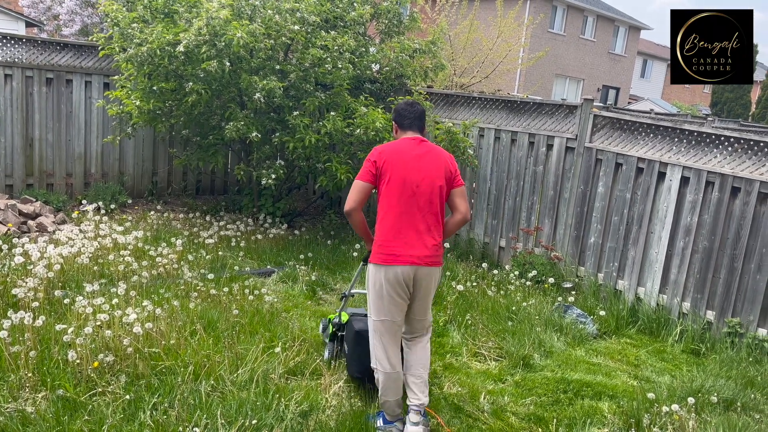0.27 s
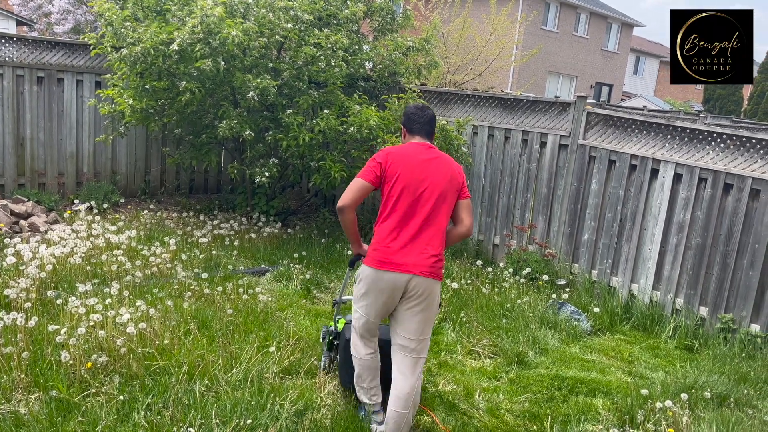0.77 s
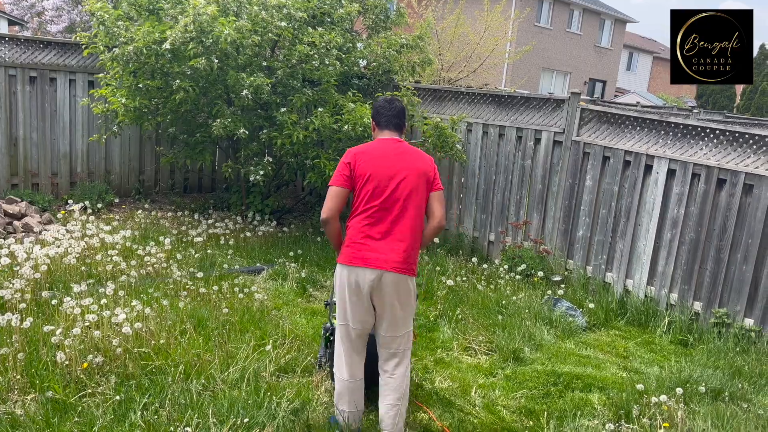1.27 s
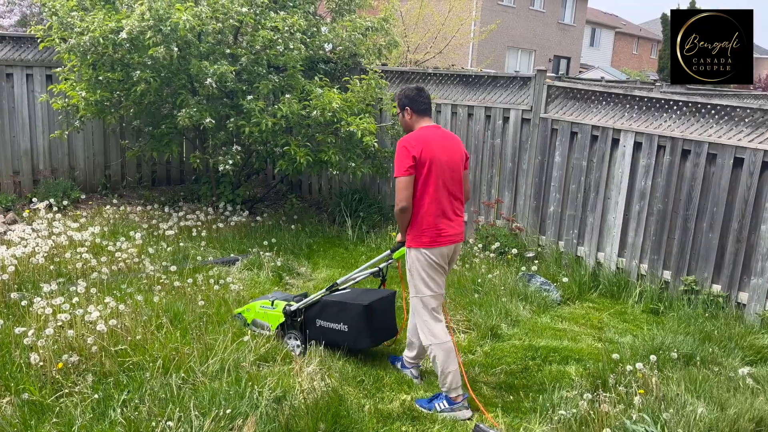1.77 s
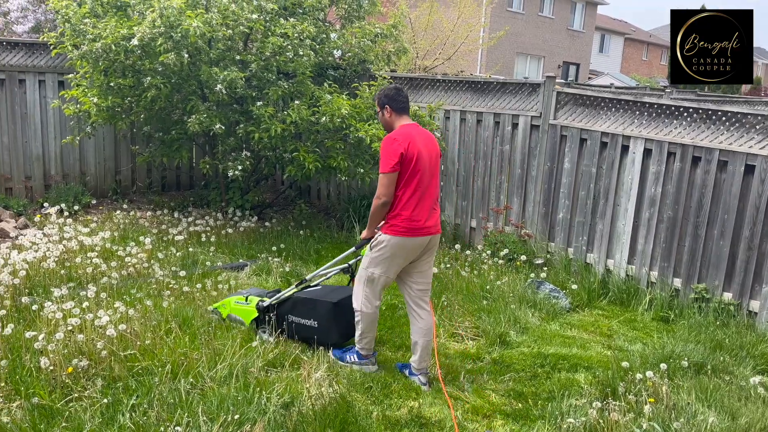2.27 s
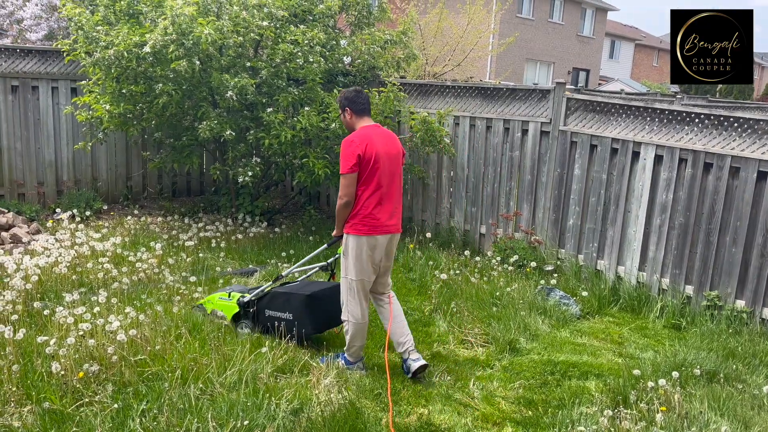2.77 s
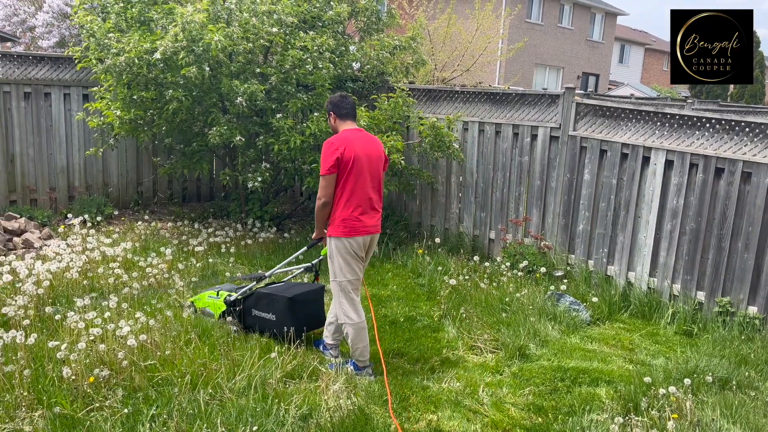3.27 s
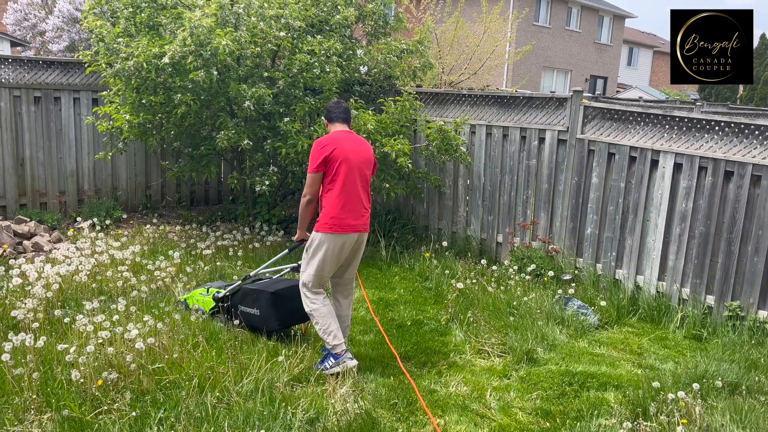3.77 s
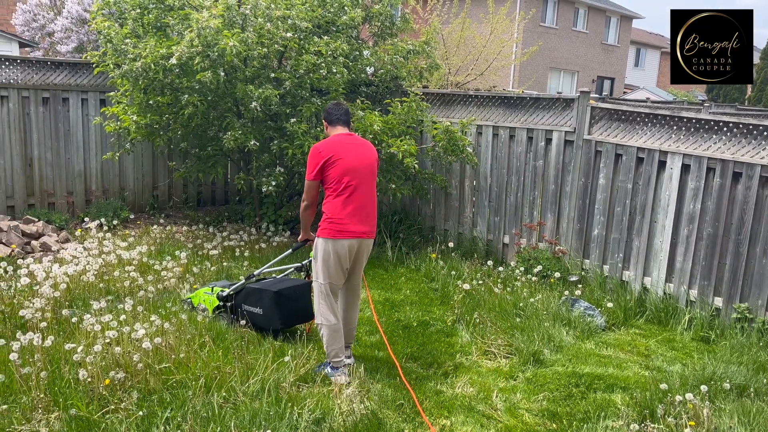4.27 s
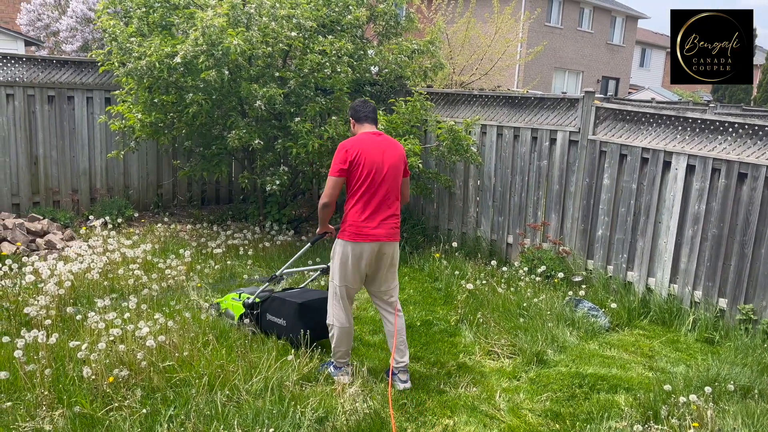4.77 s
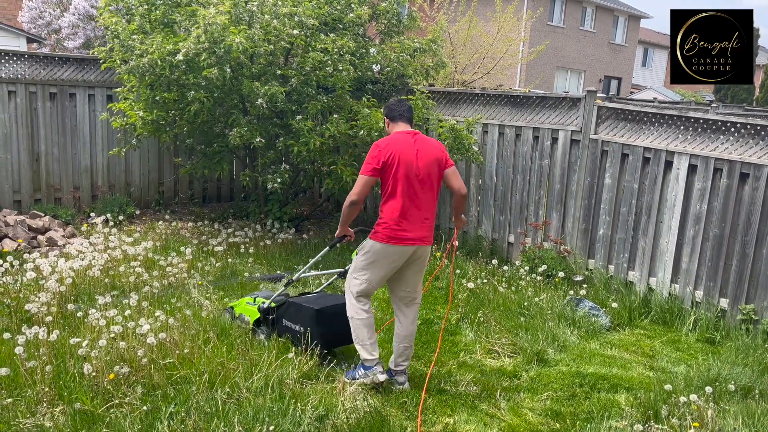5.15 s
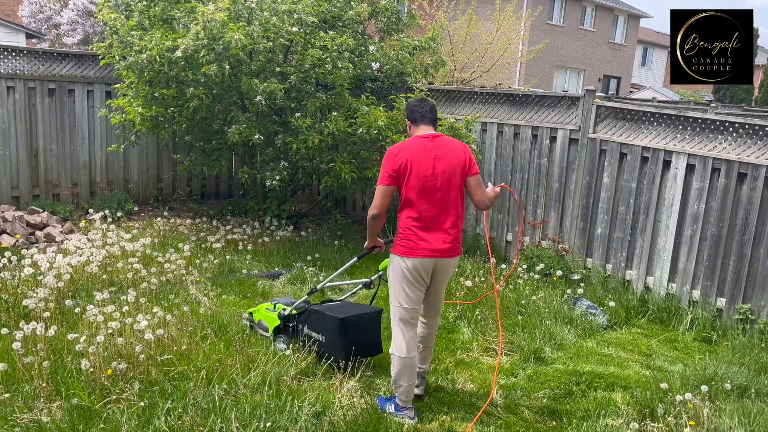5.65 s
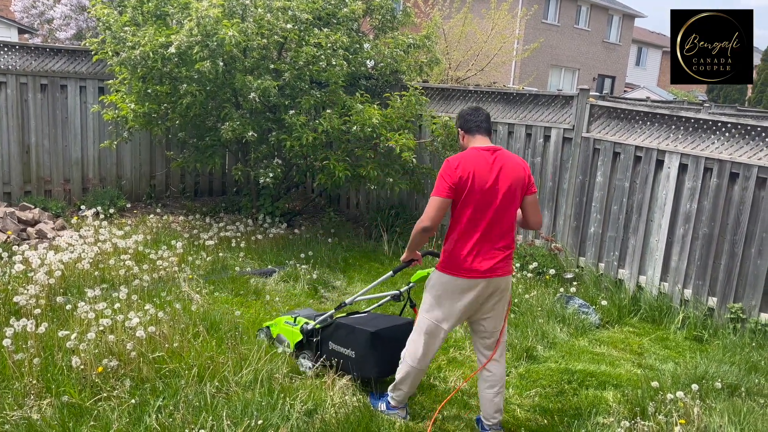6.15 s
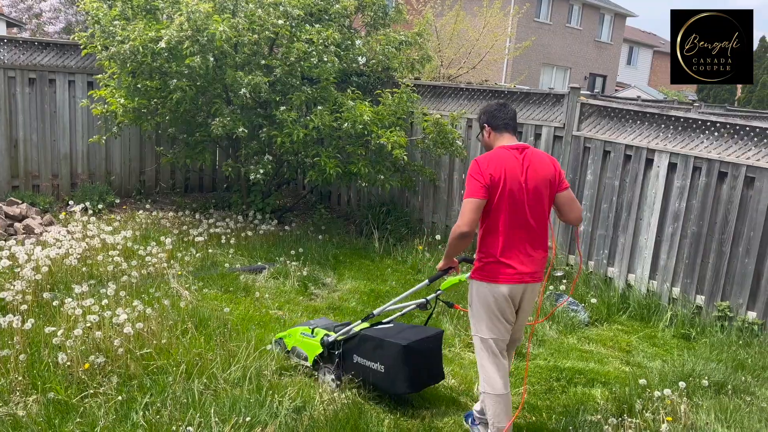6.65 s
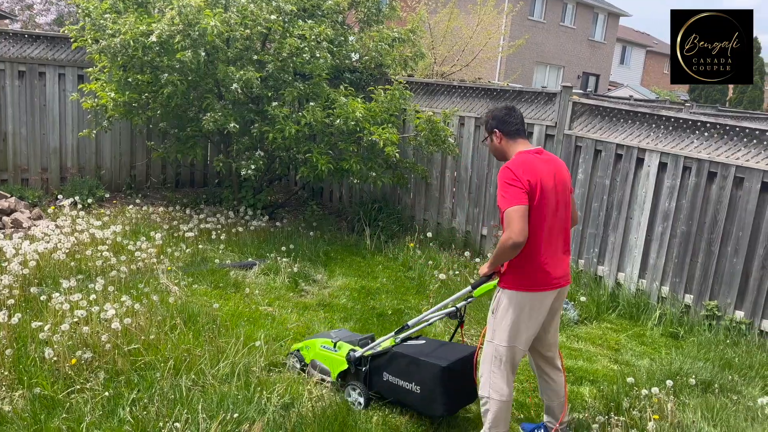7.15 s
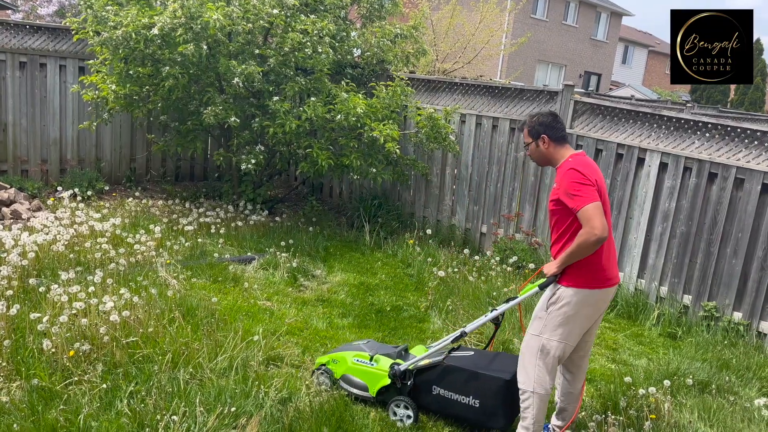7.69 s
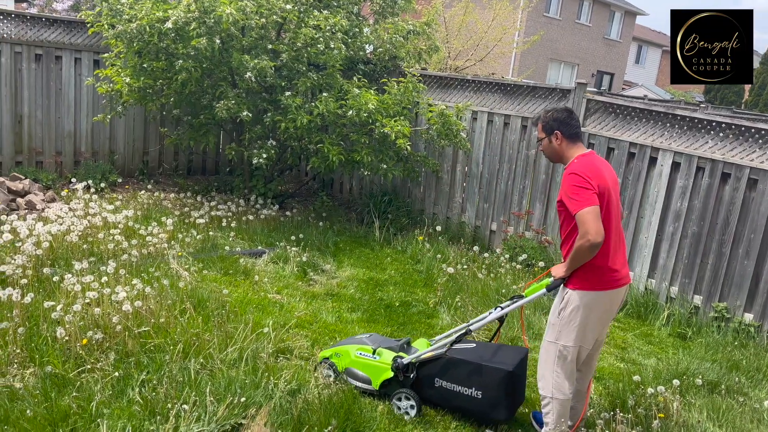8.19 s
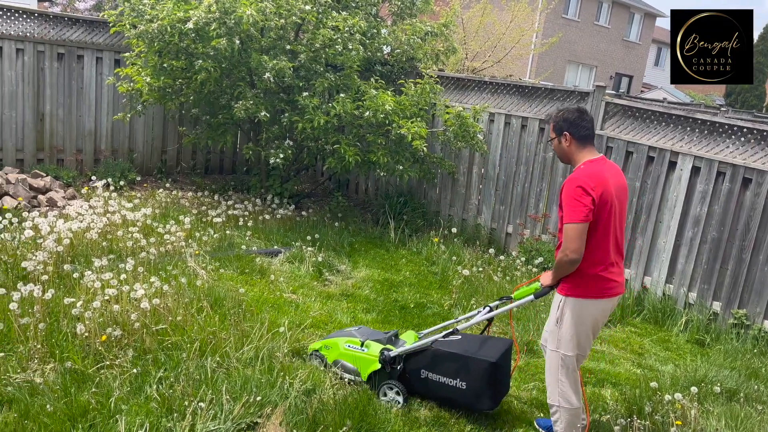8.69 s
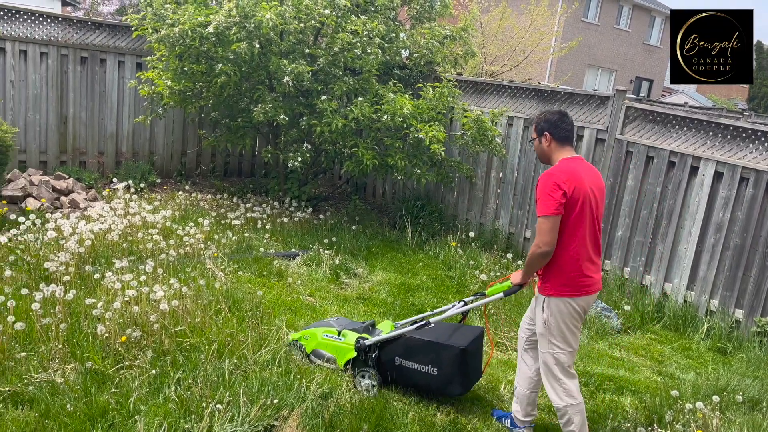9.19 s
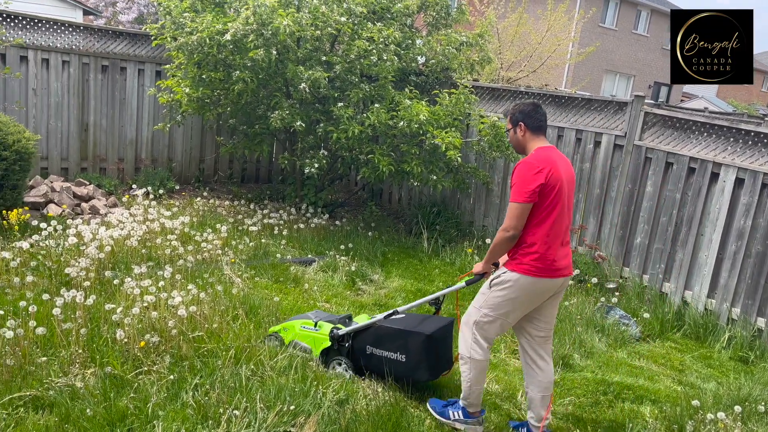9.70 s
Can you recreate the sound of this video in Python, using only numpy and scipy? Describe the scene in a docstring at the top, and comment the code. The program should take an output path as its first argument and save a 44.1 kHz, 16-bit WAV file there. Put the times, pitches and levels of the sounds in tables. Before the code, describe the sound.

An electric lawn mower hums steadily through tall grass, stalks fizzing and cracking, with a string trimmer and an engine faintly behind.

```python
"""A fenced backyard: a corded electric mower is pushed through tall grass a few metres away.
Its two-tipped blade hums at the blade-pass frequency, slows under load and churns air in the deck.
Cut stalks fizz and crack, stems rasp on the deck, clumps whoosh down the chute and chips tick on the blade.
Farther off a string trimmer whines and a six-cylinder engine drones. The sound drops out once, briefly."""
import sys
import numpy as np
from scipy import signal
from scipy.fft import rfft, irfft, next_fast_len
from scipy.io import wavfile
from scipy.ndimage import uniform_filter1d

SR = 44100
rng = np.random.default_rng(int(sys.argv[2]) if len(sys.argv) > 2 else 0)


def unload_audio(sound):
    """Save the sound as a 16-bit wav file, at the path given as the first command line argument."""
    columns = np.transpose(np.atleast_2d(sound))
    # keep every value between -1 and 1, then stretch to whole-number steps
    steps = np.round(np.clip(columns, -1, 1) * 32767)
    wavfile.write(sys.argv[1], SR, steps.astype(np.int16))


N = 437913
T = np.arange(N) / SR
FFT_SIZE = next_fast_len(N)
FFT_HZ = np.fft.rfftfreq(FFT_SIZE, 1 / SR)


def amp(db):
    """Decibels as an amplitude ratio."""
    return 10 ** (np.asarray(db) / 20)


def unit(x):
    """Normalisation to rms 1."""
    return x / np.sqrt(np.mean(x ** 2) + 1e-20)


def follow(rows, t=T):
    """Linear interpolation in time, one curve for each column after the first."""
    times, *columns = np.transpose(rows)
    return [np.interp(t, times, column) for column in columns]


def at_hz(points, hz=FFT_HZ):
    """Interpolation on a logarithmic frequency axis."""
    point_hz, values = np.transpose(points)
    return np.interp(np.log(hz + 1), np.log(point_hz), values)


def filtered(x, response):
    """Linear filtering: the spectrum is multiplied by a frequency response."""
    return irfft(rfft(x, FFT_SIZE) * response, FFT_SIZE)[..., :N]


def coloured(x, spectrum):
    """Spectral shaping by a curve in dB, normalised to rms 1."""
    return unit(filtered(x, amp(at_hz(spectrum))))


def wander(corner_hz):
    """A slow random fluctuation: low-passed noise of rms about 1."""
    grid = np.linspace(0, T[-1], 2000)
    hz = np.fft.rfftfreq(len(grid), grid[1])
    slow = irfft(rfft(rng.standard_normal(len(grid))) / (1 + (hz / corner_hz) ** 2))
    return np.interp(T, grid, unit(slow))


def burst(start, length, attack_s, release_s):
    """An envelope with a linear attack and, after its length, an exponential decay."""
    rise = np.clip((T - start) / attack_s, 0, 1)
    return rise * np.exp(-np.maximum(T - start - length, 0) / release_s)


def tone(cycles, db, flutter):
    """One partial, modulated in amplitude and phase by the moving air."""
    phase = 2 * np.pi * (cycles + rng.random())
    in_phase = (1 + flutter * wander(8.5)) * np.cos(phase)
    quadrature = flutter * wander(7.6) * np.sin(phase)
    return np.sqrt(2) * amp(db) * (in_phase + quadrature)


def ringing(drive, events, attack_s, release_s):
    """Forced resonance: each event passes the drive through one band, under its own envelope."""
    out = np.zeros((2, N))
    for start, length, db, hz, width_hz in events:
        part = slice(round(start * SR), round((start + length + 0.2) * SR))
        band = signal.butter(1, [hz - width_hz / 2, hz + width_hz / 2], "bandpass", fs=SR)
        ring = signal.lfilter(*band, signal.lfilter(*band, drive[:, part]))
        out[:, part] += amp(db) * unit(ring) * burst(start, length, attack_s, release_s)[part]
    return out


def blade_hum(passes, rush_db, load):
    """Periodic forcing by two blade tips gives a harmonic series; load makes the overtones flutter."""
    # the fundamental, louder as the mower nears: (time [s], level [dB])
    fundamental = [(0.0, -25), (1.38, -26.5), (1.44, -23), (2.08, -24), (3.3, -21), (3.86, -23),
                   (4.46, -22), (4.68, -20), (5.26, -22), (6.22, -22), (6.8, -19), (8.16, -20),
                   (8.94, -19.5), (9.92, -21.5)]
    # harmonics: (blade-pass multiple, level relative to the rush [dB], gain with load [dB])
    overtones = [(2, -3.5, -2), (3, -10, 4), (4, -13, 7), (5, -9.5, 2.5), (6, -16.5, 4), (7, -16, 3)]
    # swells and dips as the deck turns: (centre [s], half length [s], blade-pass multiple, gain [dB])
    swells = [(.23, .07, 2, -15), (1.63, 0.14, 2, 6.5), (1.923, .14, 2, -9), (2.45, 0.2, 2, 10),
              (3.2, 0.16, 2, -2), (4.2, 0.33, 2, 5), (4.9, 0.19, 2, -13), (5.68, 0.35, 2, 4),
              (6.19, 0.13, 2, -20), (7.553, 0.69, 2, 2.5), (.2, 0.46, 3, 9.5), (2.687, 0.14, 3, 7),
              (3.68, 0.12, 3, 3.5), (4.3, 0.16, 3, -15), (4.92, .3, 3, 5.5), (6.498, 0.25, 3, -9),
              (8.1, 0.21, 3, 6.5), (8.896, 0.082, 3, 9.5), (.85, .25, 4, -7), (1.68, 0.21, 4, 10),
              (4.17, 0.31, 4, -18), (6.002, 0.61, 4, 3.5), (7.8, 0.67, 4, 7.5), (9.253, 0.37, 4, 7.5),
              (0.384, 0.083, 5, -13), (.85, 0.78, 5, 6.5), (3.352, 0.098, 5, 6), (4.5, 0.54, 5, -3),
              (5.85, 0.64, 5, 4), (7.104, 0.14, 5, 6.5), (7.485, .11, 5, -6), (9.1, 0.62, 5, 3),
              (0, 0.17, 6, 9), (.87, 0.56, 6, 11.5), (2.723, 0.13, 6, 9), (3.65, 0.27, 6, 8),
              (7, .25, 6, 5.5), (8.78, .18, 6, 11.5)]
    # weaker shaft orders: (blade-pass multiple, level relative to the rush [dB], gain at full load [dB])
    shaft_orders = [(.5, -8, -1.5), (1.5, -18.5, -4), (8, -16.5, -6), (9, -14.5, -6)]
    hum = tone(passes, follow(fundamental)[0], flutter=0.05)
    for k, order_db, load_db in overtones:
        swell_db = sum(gain_db * np.exp(-((T - centre) / half_s) ** 2)
                       for centre, half_s, multiple, gain_db in swells if multiple == k)
        waver_db = (1 + 2.6 * load ** 2) * wander(4.8)
        loading_db = load_db * load - 1.6 * load ** 2
        db = rush_db + order_db + loading_db + swell_db + waver_db - 0.4
        hum += tone(k * passes, db, flutter=k * (0.03 + 0.1 * load ** 2))
    for multiple, order_db, load_db in shaft_orders:
        hum += tone(multiple * passes, rush_db + order_db + load_db * load, flutter=0.63)
    return hum


def air_rush(passes, rush_db, load):
    """Turbulence noise pulses as each tip sweeps past the chute; packed grass evens out the pulses."""
    # churned air: (frequency [Hz], relative spectral level [dB])
    spectrum = [(60, -20), (200, 1), (340, 3), (430, 0.5), (570, -2.2), (750, 0), (950, -0.5), (1150, -6.5),
                (1350, -4), (1720, -14), (3000, -21.5), (8000, -43)]
    pulses = 0.35 * np.cos(2 * np.pi * passes) + 0.12 * np.cos(4 * np.pi * passes)
    turbulence = rng.standard_normal((2, N)) * (1 + (1 - 1.2 * load) * pulses)
    return coloured(turbulence, spectrum) * amp(rush_db + 0.92 + wander(12))


def deck_roar(centre_hz=1040, edge_ratio=1.117):
    """Cavity resonance: churned air resounds in the hollow of the deck."""
    # the roar, strongest when the chute faces the listener: (time [s], level [dB])
    levels = [(0, -41), (1.38, -40), (1.44, -64), (4.7, -51), (7, -40.5), (8.1, -33.5), (8.7, -40),
              (9.93, -45)]
    band = signal.butter(2, [centre_hz / edge_ratio, centre_hz * edge_ratio], "bandpass", fs=SR)
    return unit(signal.lfilter(*band, rng.standard_normal((2, N)))) * amp(follow(levels)[0])


def cutting_level(thin_grass_db=-53.5):
    """Incoherent sources add in power: tufts and the thin grass between give the cutting level in dB."""
    # tufts pushed into the blade: (start [s], length [s], relative level [dB])
    tufts = [(0.08, 0.14, -52), (0.6, 0.15, -49), (0.87, 0.43, -51.5), (1.377, 0.52, -44),
             (1.81, 0.19, -45.5), (2.098, 0.44, -44.5), (2.556, 0.24, -40.5), (2.78, 0.29, -41.5),
             (2.988, 0.41, -44.5), (3.397, 0.31, -42.5), (3.8, 0.18, -43.5), (4.018, 0.16, -49.5),
             (4.215, 0.16, -44.5), (4.457, 0.094, -47), (4.67, 0.16, -46), (4.987, 0.23, -48.5),
             (5.23, 0.2, -44), (5.722, 0.17, -44), (5.913, 0.14, -42.5), (6.115, 0.12, -45.5),
             (6.334, 0.19, -41), (6.55, 0.38, -46), (6.79, 0.31, -42.5), (7.14, 0.17, -40.5),
             (7.338, 0.25, -42.5), (7.69, 0.59, -49), (8.26, 0.61, -45), (8.772, 0.27, -44.5),
             (9.116, 0.22, -44.5), (9.278, 0.32, -40.5), (9.611, 0.31, -40.5)]
    power = sum((amp(db) * burst(start, length, attack_s=0.048, release_s=0.091)) ** 2
                for start, length, db in tufts)
    return 10 * np.log10(amp(thin_grass_db) ** 2 + power)


def deck_whirr(passes, cutting_db):
    """Cooling air and clippings scour the plastic deck; their broadband noises add in power."""
    # scouring between tufts: (time [s], relative level [dB])
    scouring = [(0, -39.5), (1.5, -40.5), (4.8, -39), (6.5, -36.5), (8, -36.5), (9.93, -37)]
    # the scoured deck: (frequency [Hz], relative spectral level [dB])
    spectrum = [(500, -28), (1000, -13), (1500, -1), (1900, -0.5), (2800, -0.5), (3800, -3), (4700, -5.5),
                (5600, -10), (7500, -12), (10000, -34), (16000, -18)]
    strength = np.hypot(amp(follow(scouring)[0]), amp(cutting_db + 0.5))
    scour = rng.standard_normal((2, N)) * (1 + 0.1 * np.cos(2 * np.pi * passes))
    return coloured(scour, spectrum) * strength * amp(-2 + 0.5 * wander(24))


def shredding(passes, cutting_db, stalks_per_s=3000):
    """Shot noise: cut stalks click over a hiss, louder at each pass, and one tip bites harder."""
    # the fizz of cutting: (frequency [Hz], relative spectral level [dB])
    spectrum = [(800, -12), (2500, 0), (5000, 4.5), (7000, 5.5), (7800, -0.5), (9200, 6), (12000, 1),
                (13300, 2), (15700, 1)]
    bite = 1 + 0.12 * np.cos(2 * np.pi * passes) + 0.047 * np.cos(np.pi * passes)
    sizes = amp(3 * np.minimum(rng.exponential(1, (2, N)), 5))
    signs = rng.choice([-1, 1], (2, N))
    clicks = unit(sizes * signs * (rng.random((2, N)) < stalks_per_s / SR))
    hiss = 0.73 * rng.standard_normal((2, N))
    fizz = coloured((clicks + hiss) * bite, spectrum)
    clumps_db = 0.9 * wander(55)
    return fizz * amp(cutting_db + 4 + clumps_db)


def stalk_snaps(edge_ratio=1.36):
    """Damped transients: thick stalks crack against the deck, each a decaying band of noise."""
    # stalks and twigs hit by the blade: (time [s], relative level [dB], decay [s], centre [Hz])
    snaps = [(2.75, -34.5, 0.018, 3900), (3.699, -34.5, 0.0037, 2700), (6.163, -33.5, 0.018, 2200),
             (6.389, -37, 0.0053, 3970), (6.433, -39, 0.008, 4040), (6.488, -37, 0.009, 4200),
             (6.786, -34, 0.0042, 2900), (7.107, -34, 0.0039, 3200), (7.28, -37, .02, 11000),
             (8.316, -38, 0.012, 3214), (8.736, -32, .004, 3020), (8.84, -37, 0.0045, 3517),
             (9.501, -31, .003, 4440), (9.681, -26, 0.0031, 6100), (9.701, -34, .008, 3000),
             (9.859, -33, 0.0046, 3000)]
    out, t = np.zeros((2, N + SR)), np.arange(SR // 5) / SR
    for time, db, decay_s, hz in snaps:
        band = signal.butter(1, [hz / edge_ratio, hz * edge_ratio], "bandpass", fs=SR)
        crack = unit(signal.lfilter(*band, rng.standard_normal((2, len(t)))))
        envelope = np.exp(-t / decay_s) * (1 - np.exp(-8 * t / decay_s))  # long cracks rise more slowly
        start = round(time * SR)
        out[:, start:start + len(t)] += amp(db + 7) * envelope * crack
    return out[:, :N]


def stem_rasps(passes, stems_per_s=1800):
    """Impact excitation: a random train of stems rings the deck, hardest once per turn of the shaft."""
    # coarse stems on the deck: (start [s], length [s], level [dB], resonance [Hz], bandwidth [Hz])
    rasps = [(1.235, .025, -47, 4600, 300), (2.735, 0.39, -52, 2730, 420), (3.43, 0.37, -52, 2660, 420),
             (4.301, .09, -44.5, 4550, 1500), (4.318, .07, -44, 2700, 450), (7.235, 0.23, -42, 4100, 2100),
             (8.83, 0.033, -42, 11500, 4500), (9.42, 0.094, -39.5, 5510, 1300),
             (9.653, 0.044, -37, 5200, 4200)]
    strikes = rng.standard_normal((2, N)) * (rng.random((2, N)) < stems_per_s / SR)
    chop = 1 + 0.31 * np.cos(np.pi * passes)
    return ringing(strikes * chop, rasps, attack_s=0.014, release_s=0.012)


def chute_surges():
    """Cavity resonance: each clump flung down the chute gives a short, hollow whoosh."""
    # clumps of clippings: (start [s], length [s], level [dB], resonance [Hz], bandwidth [Hz])
    clumps = [(0.762, 0.034, -34, 840, 300), (0.83, .11, -35.5, 910, 280), (1.099, 0.13, -33, 835, 250),
              (1.292, 0.058, -36, 860, 300), (2.743, .07, -36.5, 730, 550),
              (3.583, 0.061, -31.5, 1007, 750), (4.678, .03, -41, 1350, 349), (4.97, .03, -36, 1190, 550),
              (6.15, .025, -34, 1290, 400), (6.854, 0.026, -34, 935, 350), (8.023, 0.15, -37, 1050, 350)]
    return ringing(rng.standard_normal((2, N)), clumps, attack_s=0.0075, release_s=0.034)


def debris_ticks(decay_s=0.0019):
    """A brief impact has a broad spectrum: hard chips tick against the blade with almost no tail."""
    # chips striking the blade: (time [s], relative level [dB])
    chips = [(0.6875, -36), (2.1297, -36), (2.139, -35), (2.816, -25), (2.8315, -32), (3.4545, -35)]
    # the colour of a tick: (frequency [Hz], relative spectral level [dB])
    spectrum = [(1000, -25), (4000, 0), (8000, -10), (12000, 6.5), (15000, -8)]
    out, t = np.zeros((2, N + SR)), np.arange(SR // 50) / SR
    for time, db in chips:
        common = rng.standard_normal(len(t))
        separate = 0.43 * rng.standard_normal((2, len(t)))
        start = round(time * SR)
        out[:, start:start + len(t)] += amp(db) * np.exp(-t / decay_s) * (common + separate)
    return filtered(out[:, :N], amp(4.5 + at_hz(spectrum)))


def cooling_fan():
    """Flow noise: the motor's fan blows a narrow-band rush through its vents, whatever the load."""
    # the fan, loudest when its vents face the listener: (time [s], level [dB])
    levels = [(0, -36.5), (2, -43.5), (4.8, -41.5), (7.8, -43), (9, -37)]
    # air in the vents: (frequency [Hz], relative spectral level [dB])
    spectrum = [(700, -37), (1220, -3.5), (1570, 1), (2100, -51)]
    return coloured(rng.standard_normal((2, N)), spectrum) * amp(follow(levels)[0])


def string_trimmer(free_hz=240.3, free_db=-48, attack_s=0.0385):
    """A distant whirling line radiates a tone and its octave; under load the tone swells and sags."""
    # the line bites into grass: (start [s], length [s], level [dB], scale of the pitch sag [Hz])
    bites = [(0, 0.14, -26.5, 7), (0.356, 0.49, -25.5, 7), (2.103, 0.87, -39, 16), (2.74, 0.23, -37, 7),
             (3.315, 0.23, -42, 4.5), (3.76, 0.25, -34, 0), (4.038, 0.23, -38.5, 6.5),
             (5.013, 0.37, -30.5, 14), (5.403, 0.48, -38.5, 1.5), (6.563, 0.7, -36, 3.5),
             (7.262, 0.88, -34.5, 3.5), (8.62, 0.64, -34, 2), (9.15, 0.24, -28.5, 8),
             (9.647, 0.22, -30.5, -1)]
    # the second harmonic: (time [s], level [dB])
    octave = [(0, -84), (3.7, -49), (4.15, -40), (5.1, -41.5), (5.7, -45.5), (7.8, -40), (8.6, -53),
              (9.93, -43)]
    hz, power = free_hz, amp(free_db) ** 2
    for start, length, db, sag_hz in bites:
        hz = hz - sag_hz * burst(start, 0, attack_s, release_s=0.25)
        power = power + (amp(db) * burst(start, length, attack_s, release_s=0.099)) ** 2
    cycles = np.cumsum(hz + 0.674 * wander(2.44)) / SR
    fundamental = tone(cycles, 10 * np.log10(power), flutter=0.2)
    return fundamental + tone(2 * cycles, follow(octave)[0], flutter=0.21)


def distant_engine(cylinders=6):
    """Only low exhaust orders carry this far; unequal cylinders add sidebands that beat as a throb."""
    # the running engine: (time [s], firing rate [Hz], level [dB])
    running = [(0, 52.2, -23), (1.38, 51.8, -24), (1.44, 52.6, -31.5), (8.95, 52.5, -29), (9.2, 48, -35),
               (9.4, 49.9, -29), (9.7, 53.2, -26.5), (9.93, 58, -38)]
    # exhaust orders: (multiple of the six-firing cycle, relative level [dB])
    orders = [(5, -34), (6, -0.5), (7, -17.5), (8, -21.5), (11, -24), (12, -21)]
    firing_hz, db = follow(running)
    cycles = np.cumsum(firing_hz) / SR / cylinders
    return sum(tone(k * cycles, db + order_db, flutter=0.033) for k, order_db in orders)


def rumble(level_db=-36.5):
    """Stationary low-frequency noise lies behind the machines."""
    # the background: (frequency [Hz], relative spectral level [dB])
    spectrum = [(20, -16), (40, -30), (60, -13), (100, -4), (150, -4.5), (190, -6.5), (300, -12),
                (500, -25), (1000, -27), (3000, -72)]
    return amp(level_db) * coloured(rng.standard_normal((2, N)), spectrum)


def partial_coherence(noise):
    """Direct and scattered noise mix into left and right; the longest waves reach both alike."""
    # likeness of left and right: (frequency [Hz], correlation, taken as 0 where negative)
    likeness = [(300, 0.37), (600, 0.35), (1500, 0.97), (2500, 0.61), (4500, 0.38), (6500, -0.2), (7800, 1),
                (16000, 1)]
    direct, scattered = noise
    scattered_share = (1 - np.clip(at_hz(likeness), 0, 1)) / 2 * np.minimum(FFT_HZ / 250, 1) ** 2
    mid = filtered(direct, np.sqrt(1 - scattered_share))
    side = filtered(scattered, np.sqrt(scattered_share))
    return np.array([mid + side, mid - side])


def deck_beams(hz, t, cutting_db, turn_s=0.24, width_hz=270):
    """Directivity: the deck beams a bright band to each side, flaring with each tuft; gains in dB."""
    # the band at each heading: (start [s], left centre [Hz], right centre [Hz], base gain [dB])
    headings = [(0, 4800, 4750, 3), (1.44, 5220, 5050, 2), (2.4, 5200, 6400, 2.5), (4.1, 5160, 6440, 7),
                (5.4, 5230, 3100, 2), (5.85, 4400, 4450, 3), (7.05, 4410, 4230, 4.5), (8.2, 4800, 4400, 4),
                (9.1, 4200, 4300, 2)]
    starts, *columns = np.transpose(headings)
    held = np.array(columns)[:, np.searchsorted(starts[1:], t)]
    left_hz, right_hz, base_db = uniform_filter1d(held, size=round(turn_s / t[1]), axis=1)
    flare_db = 0.67 * np.interp(t, T, cutting_db)
    peak_db = np.maximum(base_db + flare_db - flare_db.mean(), 0)
    return [peak_db * np.exp(-((hz - centre_hz) / width_hz) ** 2) for centre_hz in (left_hz, right_hz)]


def deck_resonances(hz, t, main_db=1.5, main_width_hz=210):
    """The modes of the plastic deck put peaks and hollows in the spectrum; gain in dB."""
    # the main resonance shifts as the mower turns and tilts: (time [s], frequency [Hz])
    main_mode = [(0, 2900), (2.1, 3220), (3.3, 2800), (4.3, 2640), (6.1, 3130), (7.6, 3000), (8.4, 2680)]
    # stationary peaks and hollows: (frequency [Hz], width [Hz], gain [dB])
    modes = [(2050, 200, 0.5), (2350, 130, -1.5), (3560, 120, -2.5)]
    moving_db = main_db * np.exp(-((hz - follow(main_mode, t)[0]) / main_width_hz) ** 2)
    return moving_db + sum(db * np.exp(-((hz - mode_hz) / width) ** 2) for mode_hz, width, db in modes)


def deck_and_yard(pair, cutting_db, reflections=5):
    """Comb filtering: the deck colours the noise, and echoes that drift as the mower moves interfere."""
    # each close reflection; grass absorbs the highest treble: (frequency [Hz], amplitude ratio)
    reflectance = [(200, .1), (900, .18), (6500, .2), (8500, .03)]
    hz, t, spectra = signal.stft(pair, SR, nperseg=1024)
    hz = hz[:, None]
    strength = at_hz(reflectance, hz)
    deck_db = deck_resonances(hz, t)
    channels = []
    for spectrum, beam_db in zip(spectra, deck_beams(hz, t, cutting_db)):
        paths = 1  # the direct sound
        for delay_s in np.geomspace(0.0011, 0.0055, reflections):
            drift_s = 0.00015 * np.interp(t, T, wander(0.26))
            paths = paths + strength * np.exp(-2j * np.pi * hz * (delay_s + drift_s))
        comb = paths / np.sqrt(1 + reflections * strength ** 2)
        channels.append(spectrum * amp(deck_db + beam_db) * comb)
    return signal.istft(np.array(channels), SR, nperseg=1024)[1][:, :N]


def stereo_image(pair):
    """Left and right differ in level and phase, and the differences vary with frequency; in the treble the
    phase difference swings widely."""
    # level difference: (frequency [Hz], left minus right [dB])
    balance = [(250, -.8), (550, -.2), (1000, 0), (1400, -2.2), (2100, 2), (4900, 2.8), (6300, -.3),
               (7800, 0)]
    # phase difference: (frequency [Hz], lead of the left [rad])
    lead = [(140, 0), (500, .45), (950, .9), (1300, 2.1), (1600, 3.1), (1800, .3), (3200, 1), (5000, .5),
            (5700, -1.2), (6900, -1.2), (7800, -3.1), (8900, -3.2), (11000, -6.25), (12900, -6.3),
            (14500, -9.4)]
    sides = np.array([[0.5], [-0.5]])
    return filtered(pair, amp(sides * at_hz(balance)) * np.exp(1j * sides * at_hz(lead)))


def scene():
    """Superposition: one blade rotation paces hum, rush and cutting; machines and rumble lie behind."""
    # the motor slows in thick grass: (time [s], blade-pass frequency [Hz])
    blade_speed = [(0.0, 130.7), (0.6, 132.8), (1.62, 131.5), (1.96, 126.7), (2.6, 125.7), (3.16, 121.4),
                   (3.44, 122.4), (3.84, 121.5), (4.74, 129.5), (5.25, 131.5), (5.8, 132.5), (6.66, 129.0),
                   (6.79, 130.2), (7.54, 128.0), (8.08, 131.5), (9.34, 131.2), (9.92, 126.2)]
    # air churned in the deck: (time [s], relative level [dB])
    rush_levels = [(0.0, -30), (0.36, -32.5), (0.64, -31), (1.38, -32.5), (1.44, -35), (2.0, -38),
                   (2.74, -36.5), (3.64, -38.5), (3.98, -37), (5.54, -32), (5.72, -31), (6.02, -31.5),
                   (7.08, -30), (9.1, -31.5), (9.48, -30.5), (9.92, -37)]
    pass_hz, rush_db = follow(blade_speed)[0], follow(rush_levels)[0]
    cutting_db = cutting_level()
    load = (pass_hz.max() - pass_hz) / np.ptp(pass_hz)  # 0 at the fastest, 1 at the slowest
    jitter = (0.00099 + 0.00324 * load) * wander(7.48)
    passes = np.cumsum(pass_hz * (1 + jitter)) / SR
    tones = blade_hum(passes, rush_db, load) + string_trimmer() + distant_engine()
    noise = rumble() + air_rush(passes, rush_db, load) + deck_roar()
    noise += deck_whirr(passes, cutting_db) + shredding(passes, cutting_db) + stalk_snaps()
    noise += cooling_fan() + stem_rasps(passes) + chute_surges()
    return stereo_image(tones + deck_and_yard(partial_coherence(noise), cutting_db)) + debris_ticks()


def record(dry):
    """Gating and band limiting: one brief silent gap, then a low-pass filter."""
    gap_start_s, gap_end_s, cutoff_hz = 1.383, 1.441, 15680
    live = (T < gap_start_s) | (T > gap_end_s)
    gate = uniform_filter1d(live.astype(float), size=260)
    low_pass = signal.firwin(511, cutoff_hz, window=("kaiser", 9), fs=SR)
    return signal.oaconvolve(dry * gate, low_pass[None], "same")


dry = scene()
out = record(dry)
unload_audio(out)
```